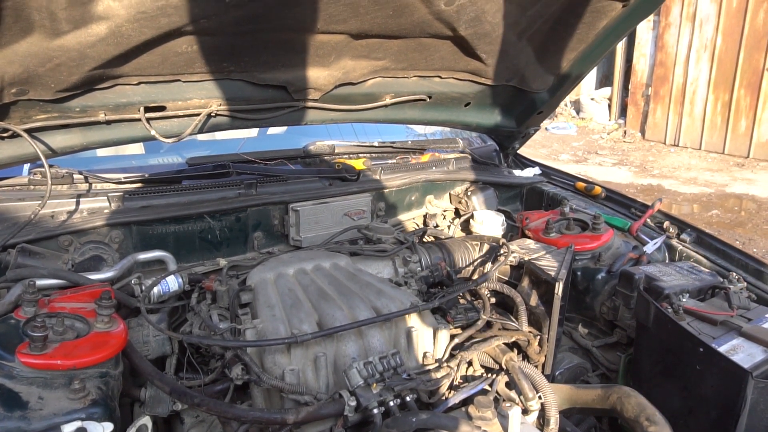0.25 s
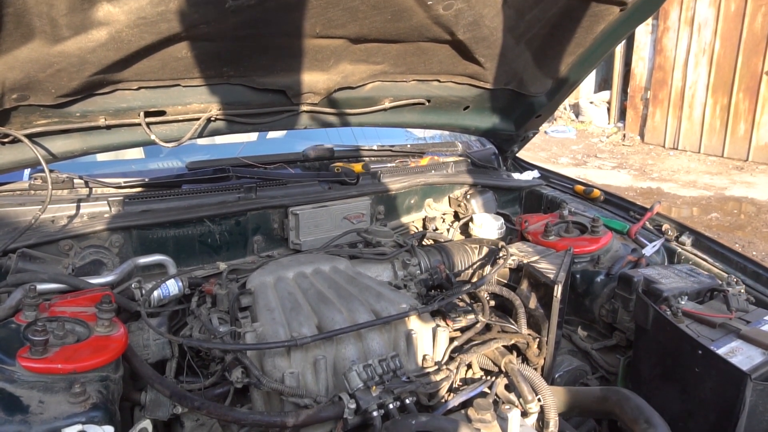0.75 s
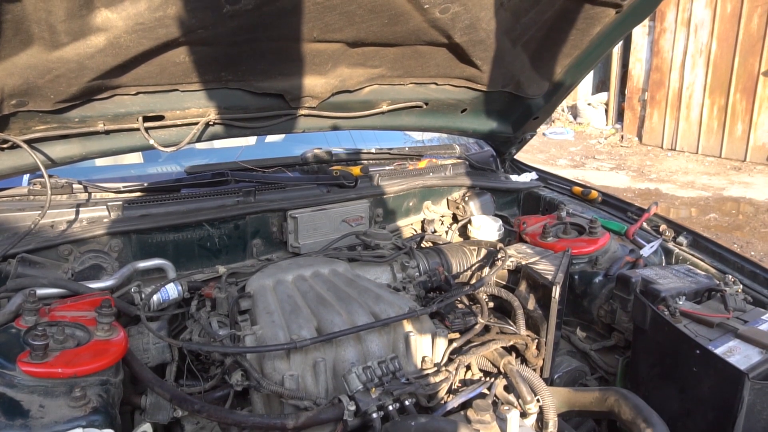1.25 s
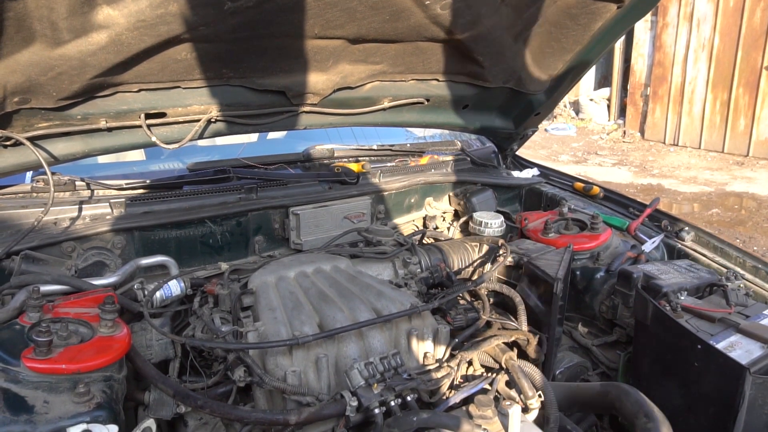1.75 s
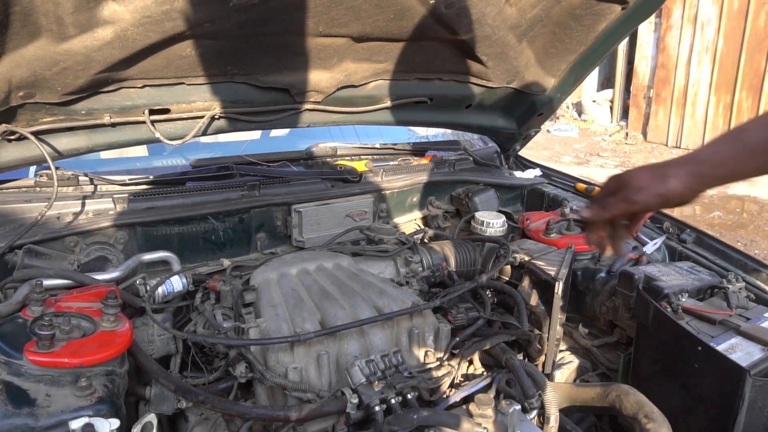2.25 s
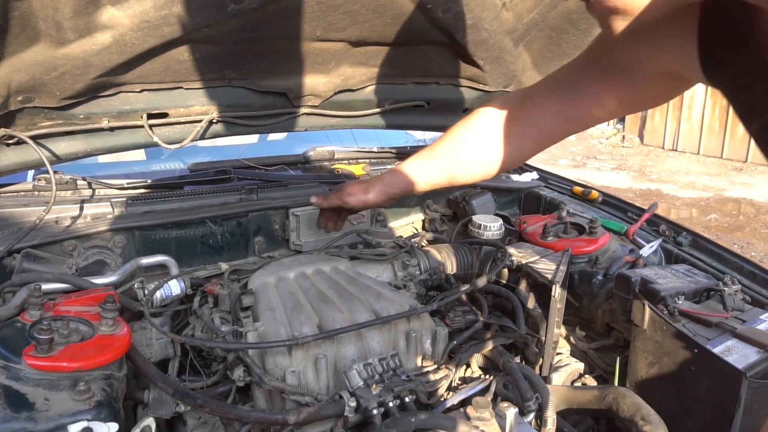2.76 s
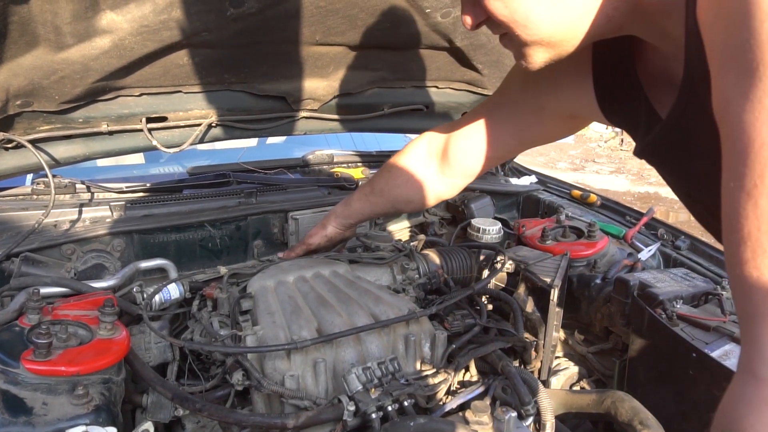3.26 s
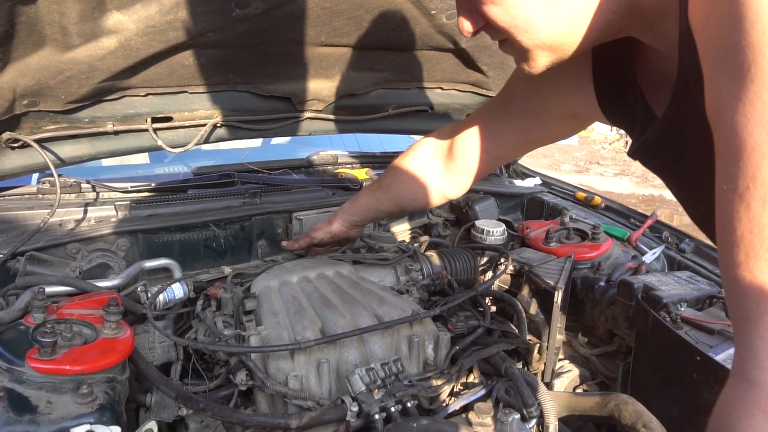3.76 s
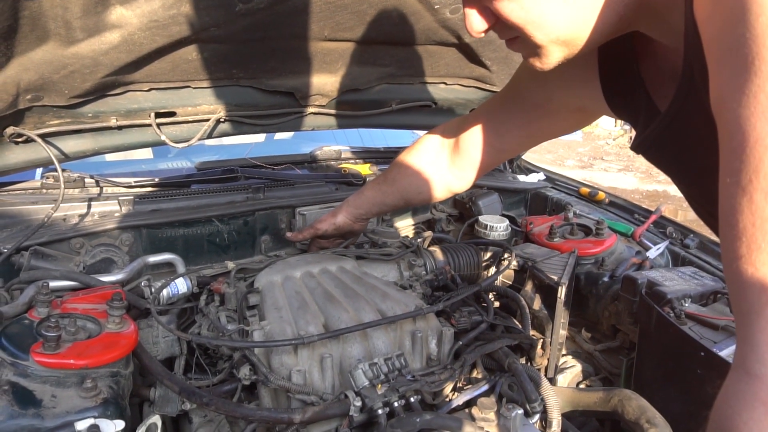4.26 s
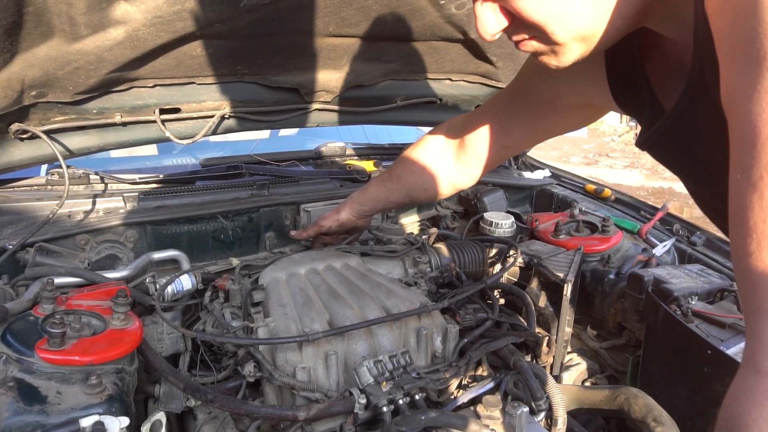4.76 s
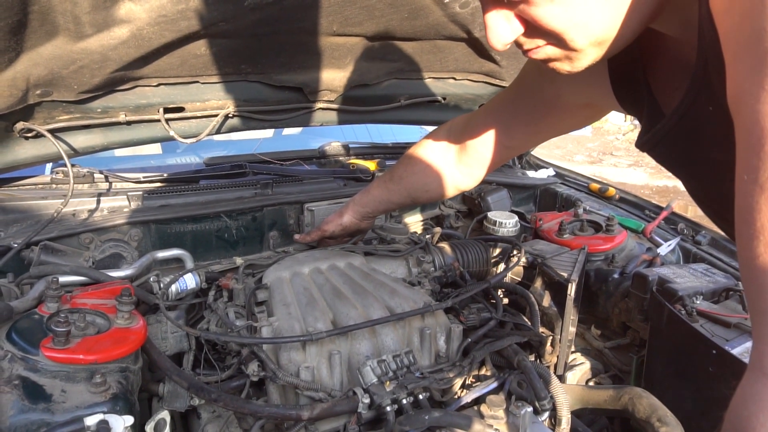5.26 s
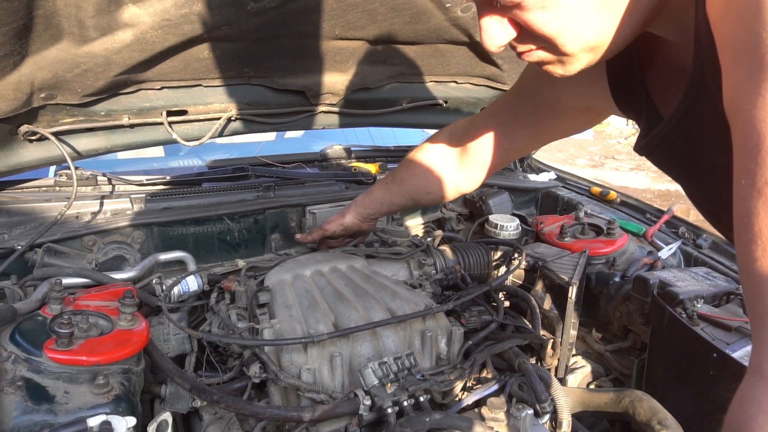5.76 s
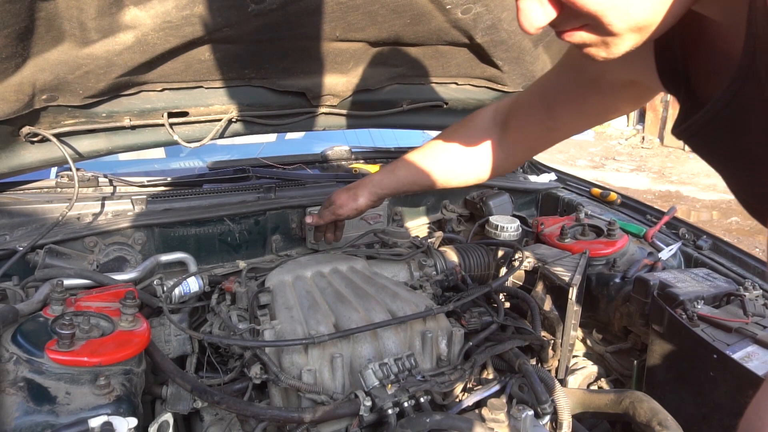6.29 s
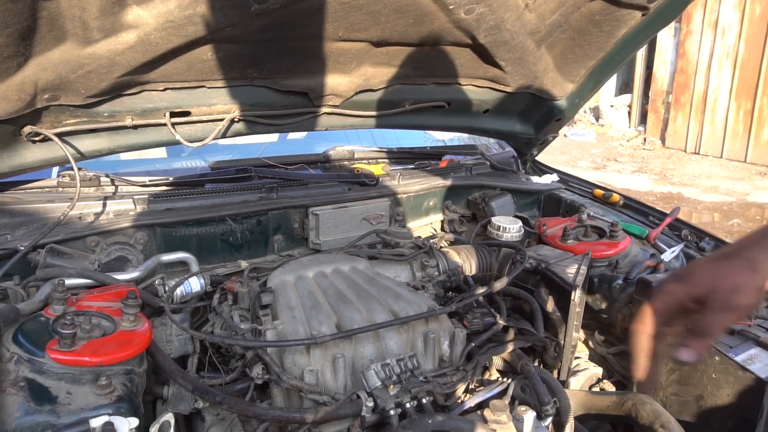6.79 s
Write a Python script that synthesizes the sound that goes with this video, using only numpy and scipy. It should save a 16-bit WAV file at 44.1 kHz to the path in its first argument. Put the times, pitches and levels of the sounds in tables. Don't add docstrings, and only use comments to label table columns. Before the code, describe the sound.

From the start, a piercing drive-belt squeal around 3.8 kilohertz dominates, recorded so close that it overloads into harsh, flattened distortion. Its pitch flutters quickly and jerks at irregular moments, smeared by short metallic reflections under the bonnet. A car engine's broad roar, buried knocking and a steady accessory whine sit behind. Around 4.2 to 4.6 seconds the low whine is dragged upward while the squeal sags; at 4.5 a second pulley adds a rough groan near 1.4 kilohertz and bright rubber hiss. Near 5.9 both pitches sink lower, the groan jumping back at 6.1. From 6.2 the squeal climbs steeply past 4 kilohertz and cuts off by 6.4. The quieter engine remains, its fast knocks and crisp injector ticks gradually lifted by the gain control, with a faint thin whistle from 6.8 until the end at about 7 seconds.

```python
import sys
import numpy as np
from scipy import signal
from scipy.io import wavfile
from scipy.ndimage import uniform_filter1d

SR = 44100
rng = np.random.default_rng(int(sys.argv[2]) if len(sys.argv) > 2 else 0)


def decibels_to_gain(level_db):
    exponent = np.asarray(level_db, float) / 20
    return 10 ** exponent


def generate_wav(sig):
    pcm = np.round(np.clip(np.atleast_2d(sig).T, -1, 1) * 32767).astype(np.int16)
    wavfile.write(sys.argv[1], SR, pcm)


N = 309968


def rms_one(x):
    return x / np.sqrt(np.mean(np.abs(x) ** 2) + 1e-20)


def in_time(rows):
    s, *columns = np.transpose(rows)
    return [np.interp(np.arange(N) / SR, s, c) for c in columns]


def drift(rate_hz):
    r = np.exp(-2 * np.pi * rate_hz / SR)
    slow = signal.lfilter([1], [1, -2 * r, r * r], rng.standard_normal(N + SR))
    return rms_one(slow[SR:])


def coloured(spectrum, patchy_db):
    out = 0
    edges = 25 * 2 ** np.arange(0, 9.5, 1 / 3)
    white = rng.standard_normal((2, N))
    hz, level_db = np.transpose(spectrum)
    for k, (low, high) in enumerate(zip(edges, edges[1:])):
        band_pass = signal.butter(2, [low, high], "band", fs=SR, output="sos")
        band = signal.sosfilt(band_pass, white[k % 2])
        band_db = np.interp(np.log(low * high) / 2, np.log(hz), level_db)
        out = out + band * decibels_to_gain(band_db + patchy_db * drift(45))
    return rms_one(out)


def resonance(x, hz, width_hz):
    r = np.exp(-np.pi * width_hz / SR)
    poles = [1, -2 * r * np.cos(2 * np.pi * hz / SR), r * r]
    return signal.lfilter(np.array([1, 0, -1]) * (1 - r * r) / 2, poles, x)


def partials(hz, levels_db, steady, fade_rate, tug=0):
    turn, out = 2 * np.pi * np.cumsum(hz) / SR, 0
    for k, level_db in enumerate(levels_db):
        constant = steady / (k + 1) * np.exp(1j * drift(2.8))
        ribs = rms_one(constant + drift(fade_rate) + 1j * drift(fade_rate))
        out = out + decibels_to_gain(level_db) * np.real(ribs * np.exp(1j * ((k + 1) * turn + tug)))
    return out


def bay(x):
    t = np.arange(SR // 8) / SR
    tail = rng.standard_normal(len(t)) * decibels_to_gain(-60 * t / .09)
    return x + decibels_to_gain(-6.5) * signal.fftconvolve(x, tail / np.sqrt(np.sum(tail ** 2)))[:N]


EXTRA_LOAD_S = (4.535, 4.56, 6.23, 6.31)


def extra_load():
    return np.interp(np.arange(N) / SR, EXTRA_LOAD_S, [0, 1, 1, 0])


def bumps(turning, rows):
    start_s, rate, change = turning
    t = np.arange(N) / SR - start_s
    turns = rate * t + change * t * t / 2
    return sum(swing * np.cos(2 * np.pi * (per_turn * turns - lag)) for per_turn, swing, lag in rows)


# count/turn, swing f/Hz, lag/turn
BELT_BUMPS_EARLY = [(5, 22, .68), (10, 44, .56), (12, 43, .17), (15, 15, .36), (20, 10, .94), (25, 14, .95)]
BELT_BUMPS_LATE = [(4, 10, .79), (6, 13, .92), (10, 13, .96), (12, 28, .79), (15, 12, .53), (20, 10, .53)]
PULLEY_BUMPS_EARLY = [(1, 32, .29), (2, 26, .95)]
PULLEY_BUMPS_LATE = [(1, 31, .35)]
# t/s, pitch step f/Hz
JERKS = [(0.092, -70), (0.245, 90), (0.483, 100), (0.686, 70), (0.836, -100), (1.012, 80), (1.377, -110),
         (2.165, 70), (2.411, -70), (3.135, -85), (3.51, 85), (4.244, -70), (4.258, 110), (4.282, -70),
         (4.34, 75), (4.536, -190), (4.552, 75), (4.731, 85), (5.254, -80), (5.719, 80), (5.751, 80),
         (5.807, -170), (5.835, -70), (5.861, 110), (5.942, -90), (6.102, -85), (6.204, 85)]
# from t/s, turns per s, its change each second
BELT_EARLY, BELT_LATE = (0, 2.1694, -.0069), (4.6, 2.0746, .0291)
PULLEY_EARLY, PULLEY_LATE = (0, 19.968, .2138), (4.6, 30.506, -.3169)


def wobble(jitter_hz, jerk_s):
    t = np.arange(N) / SR
    early = bumps(BELT_EARLY, BELT_BUMPS_EARLY) + bumps(PULLEY_EARLY, PULLEY_BUMPS_EARLY)
    late = bumps(BELT_LATE, BELT_BUMPS_LATE) + bumps(PULLEY_LATE, PULLEY_BUMPS_LATE)
    share = np.interp(t, (4.3, 4.6), [0, 1])
    jerks = sum(hz * np.exp(-((t - s) / jerk_s) ** 2) for s, hz in JERKS)
    flares = 32 * drift(450) * decibels_to_gain(5.0 * np.minimum(drift(45), 1.6))
    return 1.271 * ((1 - share) * early + share * late + jerks) + jitter_hz * drift(44.9) + flares


# t/s, slip rate f/Hz, level over overload/dB
SQUEAL = [(0, 3834, 7), (2, 3842, 6.5), (4.15, 3844, 5), (4.4, 3744, 6), (4.65, 3650, 7.5),
          (4.9, 3632, 3.5), (5.2, 3682, 6.5), (5.55, 3693, 7), (5.87, 3522, 9), (6.1, 3485, 7),
          (6.23, 3713, 9.5), (6.29, 3900, -1), (6.345, 4280, -0.5), (6.375, 4380, -7), (6.39, 4370, -17),
          (6.4, 4500, -70)]
# f/Hz, width f/Hz, added share
BONNET = [(2190, 61, 0.31), (4740, 350, -0.5), (5560, 71, 1.4), (3899, 37.4, -0.78), (7110, 40, 1.1),
          (7237, 110, 0.86), (7960, 420, 0.79)]


def belt():
    load, swing = extra_load(), wobble(jitter_hz=12, jerk_s=.007)
    squeal_hz, squeal_db = in_time(SQUEAL)
    groan, tug = second_pulley(swing, squeal_hz)
    flutter_db = (-0.0087 + 0.0329 * load) * swing
    octave_db = -7.5 + 1.104 * squeal_db + 3 * load
    levels_db = [squeal_db + flutter_db, octave_db, squeal_db - 15, squeal_db - 17]
    squeal = partials(squeal_hz + swing, levels_db, steady=2.67, fade_rate=115.4, tug=tug)
    standing = sum(share * resonance(squeal, hz, width) for hz, width, share in BONNET)
    return bay(groan + squeal + standing)


# t/s, f/Hz, level/dB
WHINE = [
    (0, 600, -16.5),
    (4.2, 598.5, -21),
    (4.4, 660, -12),
    (4.55, 690, -12),
    (4.62, 650, -21),
    (5.8, 645, -19.5),
    (6.4, 650, -44),
]
# t/s, f/Hz, level/dB
THIN_WHISTLE = [
    (6.76, 4540, -70),
    (6.82, 4540, -31),
    (7.03, 4540, -31),
]
# f/Hz, level/dB
HUMS = [(544, -27), (673, -24), (1062, -25), (1281, -24), (1719, -32)]
# f/Hz, level/dB
IDLE_TONES = [(285.3, -45), (306.8, -52), (376.8, -38), (651.4, -35.5), (1001, -33.5), (1157, -57)]


def whines():
    t, out = np.arange(N) / SR, 0
    low_hz, low_db = in_time(WHINE)
    low_db = low_db + np.interp(t, (7.7, 6.65), [0, 20.7])
    high_hz, high_db = in_time(THIN_WHISTLE)
    fading_db = np.interp(t, (5.5, 4.1), [0, -8])
    bared_db = np.interp(t, (6.6, 6.4), [-12, 8])
    for hz, level_db in HUMS:
        out = out + partials(np.full(N, hz), [level_db + fading_db], steady=1.8, fade_rate=9)
    for hz, level_db in IDLE_TONES:
        out = out + partials(np.full(N, hz), [level_db + bared_db], steady=1.2, fade_rate=16)
    whine = partials(low_hz, [low_db], steady=7.6, fade_rate=14)
    whistle = partials(high_hz, [high_db], steady=7.0, fade_rate=12)
    return whine + whistle + out


GRIP_S = (6.3, 6.42)


def gripped():
    return np.interp(np.arange(N) / SR, GRIP_S, [0, 1])


# f/Hz, level per Hz/dB
HISS = [(1500, -14), (3000, -13), (6000, -8), (10000, 20.5), (12000, 6), (13200, 10), (16000, 24)]


def rubbing():
    growing_db = 18.5 + 1 * (np.arange(N) / SR - EXTRA_LOAD_S[0])
    level_db = -24 + extra_load() * growing_db - 57 * gripped()
    return decibels_to_gain(level_db) * coloured(HISS, patchy_db=1.0)


# t/s, peak level/dB, ring f/Hz
KNOCKS = [(6.3111, -12, 1320), (6.3738, -9, 1244), (6.434, -7.5, 1256), (6.497, -8, 1250), (6.56, -6, 1235),
          (6.625, -5, 1230), (6.6634, -8, 1180), (6.6957, -7, 1385), (6.7334, -7, 1073), (6.823, -7, 1287),
          (6.8848, -4, 1245), (6.9284, -3.5, 1300), (6.9575, -3, 1234), (6.9924, -11, 1237),
          (7.0183, -2, 1280)]
RELEASE_DB_PER_S = 12


def knocking(hidden_db, ring_s):
    first_s, t, out = KNOCKS[0][0], np.arange(SR // 12) / SR, np.zeros(N + SR)
    period_s = .062
    hidden_s = np.arange(first_s - period_s, 0, -period_s)
    chance = rng.standard_normal((len(hidden_s), 2))
    hidden = np.transpose([hidden_s, hidden_db + 1.8 * chance[:, 0], 1265 + 40 * chance[:, 1]])
    swell = t / ring_s * np.exp(1 - t / ring_s)
    for s, peak_db, hz in [*KNOCKS, *hidden]:
        lifted_db = RELEASE_DB_PER_S * max(s - first_s, 0)
        ring = np.sin(2 * np.pi * hz * t) + .6 * np.sin(2 * np.pi * 1.17 * hz * t)
        start = int(s * SR)
        out[start:start + len(t)] += decibels_to_gain(peak_db - lifted_db) * swell * ring
    return out[:N]


# f/Hz, level per Hz/dB
ENGINE = [(18, -64), (30, -21), (199, -9.5), (273, -3.5), (364, -2), (584, -0.5), (649, -2.5), (866, -4),
          (1250, 0), (2120, -7.5), (2830, -10), (3770, -12), (4650, -16.5), (16000, -37.5)]
# f/Hz, width f/Hz, level/dB
BLOCK = [(360, 20, -21), (650, 70, -28), (988, 30, -5), (1250, 37, -17), (1435, 230, -38), (2250, 84, -11),
         (2756, 50, 5.5)]


def engine():
    settling_db = -1.5 - 2 * (np.arange(N) / SR - GRIP_S[1])
    level_db = -14.5 + 1 * extra_load() + gripped() * settling_db
    roar = coloured(ENGINE, patchy_db=-0.5)
    shaken = rng.standard_normal(N)
    block = sum(decibels_to_gain(db) * resonance(shaken, hz, width) * np.sqrt(100 / width) for hz, width, db in BLOCK)
    knocks = decibels_to_gain(13) * knocking(hidden_db=-16, ring_s=.006)
    return decibels_to_gain(level_db) * (roar + decibels_to_gain(1.5) * block + knocks + ticking())


# from t/s, f/Hz, fundamental level/dB, octave level/dB, grip on squeal/dB
GROAN = [
    (4.535, 1424, -10, -10, -10.5),
    (5.761, 1417, -7.5, -19, -12),
    (5.91, 1294, -13, -6.5, -7),
    (6.13, 1405, -6.5, -11, -14.5),
    (6.2, 1374, -25, -22, -17),
]


def groan_states(squeal_hz):
    held, before = [], GROAN[0][1:]
    for s, *now in GROAN:
        held += [(s, *before), (s + 0.0194, *now)]
        before = now
    hz, *levels_db = in_time(held)
    silenced_db = -31 * (1 - extra_load())
    return hz + .25 * (squeal_hz - 3650), *(np.array(levels_db) + silenced_db)


def second_pulley(swing, squeal_hz):
    hz, first_db, octave_db, grip_db = groan_states(squeal_hz)
    groan = partials(hz + 0.09 * swing, [first_db, octave_db], steady=1.6, fade_rate=37.0)
    halved = (hz + 0.078 * swing) / 2
    tug_db = [grip_db - 11.5, grip_db, grip_db - 13, grip_db - 11.0]
    return groan, partials(halved, tug_db, steady=7.5, fade_rate=58)


# place/cycle, level/dB
TICKS = [
    (0, 0),
    (.33, -4),
    (.64, 0),
]


def ticking():
    clicks, cycles = np.zeros(N + SR), np.arange(-1, 10)
    for place, level_db in TICKS:
        turns = cycles + place
        s = 6.455 + .0618 * turns + .0003 * turns ** 2
        clicks[(s * SR).astype(int)] = decibels_to_gain(-11.5 + level_db + rng.normal(0, 1.5, len(s)))
    decay_s = .005
    puffs = signal.lfilter([1], [1, -np.exp(-1 / (decay_s * SR))], clicks[:N]) * rng.standard_normal(N)
    return signal.sosfilt(signal.butter(2, 4500, "high", fs=SR, output="sos"), puffs)


def scene():
    hiss = rubbing()
    return (belt() + whines() + hiss + engine())[None]


def low_pass(x):
    return signal.sosfilt(signal.butter(12, 17090, fs=SR, output="sos"), x)


def record(dry):
    knee, overload, hold_db = 6.0, 0.31, -16
    fine = signal.resample_poly(dry[0], 3, 1)
    bent = fine / (1 + np.abs(fine) ** knee) ** (1 / knee)
    flat = signal.resample_poly(bent, 1, 3)
    droop = signal.butter(1, 19000, fs=SR, output="sos")
    x = overload * signal.sosfiltfilt(droop, flat)
    level_db = 10 * np.log10(uniform_filter1d(x ** 2, size=4400) + 1e-12)
    ramp = RELEASE_DB_PER_S * np.arange(N) / SR
    held_db = np.maximum.accumulate(np.minimum(level_db, hold_db) + ramp) - ramp
    x = x * decibels_to_gain(hold_db - held_db) + 0.0056
    x = signal.sosfiltfilt(signal.ellip(12, .2, 40, 15725, fs=SR, output="sos"), x)
    return low_pass(x[None])


dry = scene()
out = record(dry)
generate_wav(out)
```